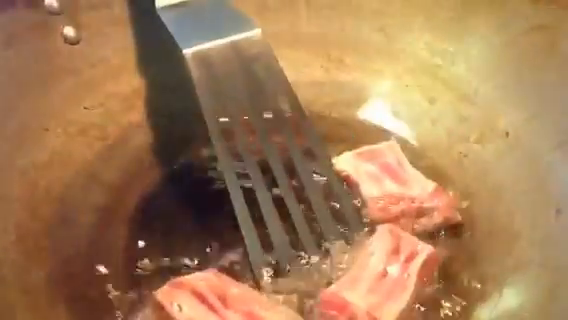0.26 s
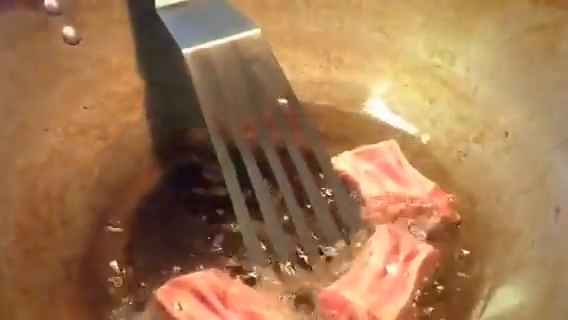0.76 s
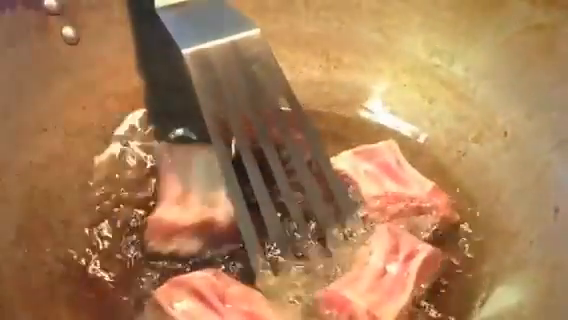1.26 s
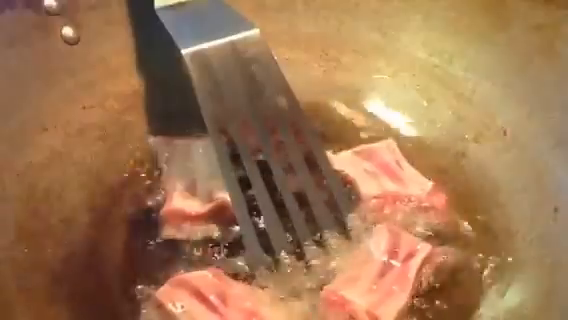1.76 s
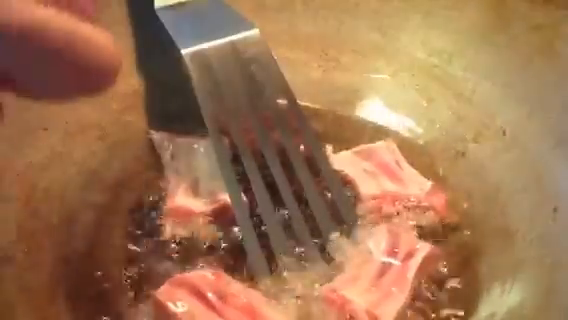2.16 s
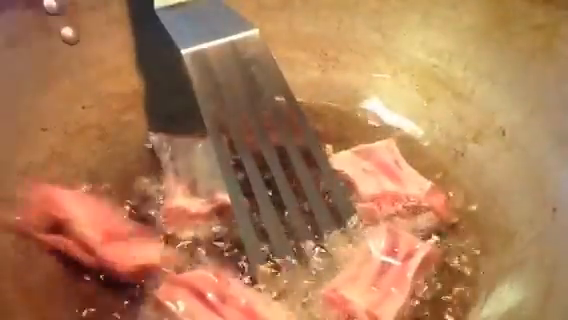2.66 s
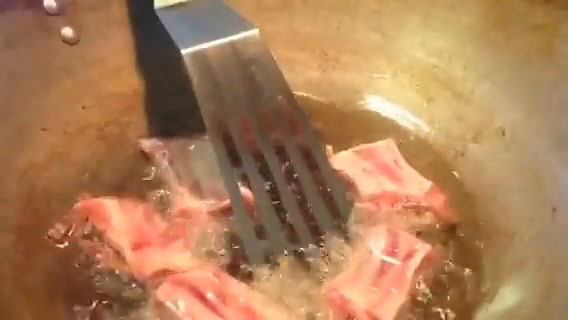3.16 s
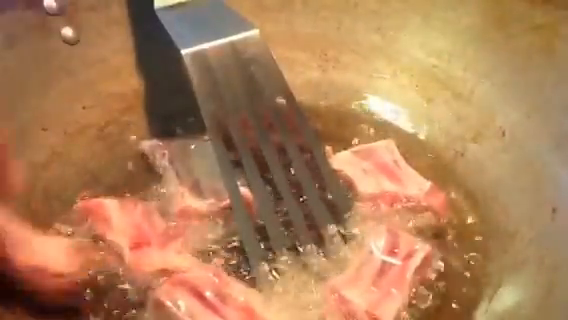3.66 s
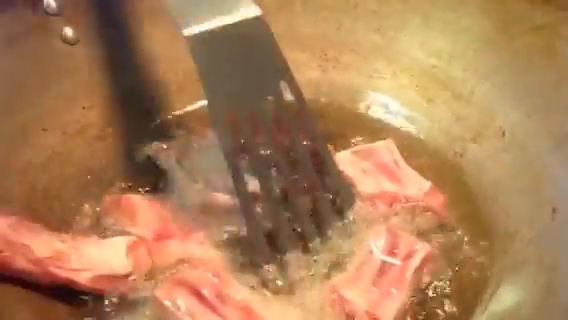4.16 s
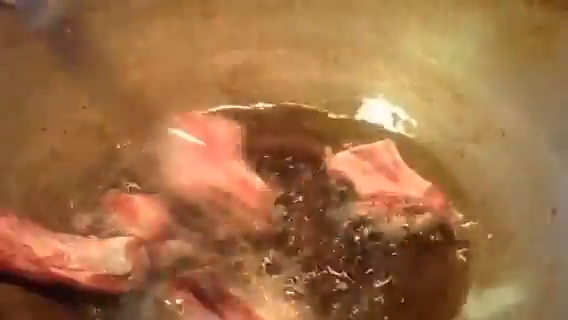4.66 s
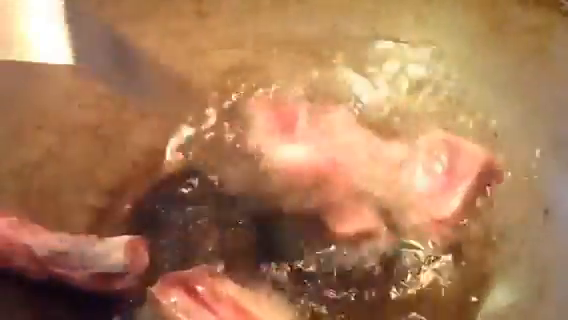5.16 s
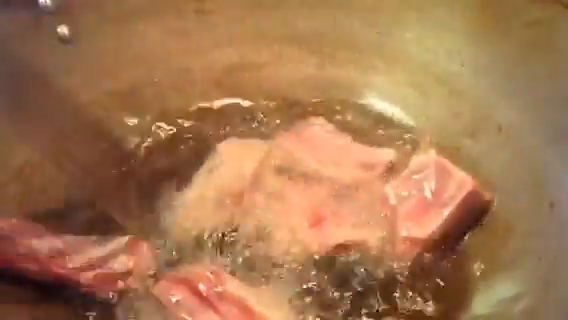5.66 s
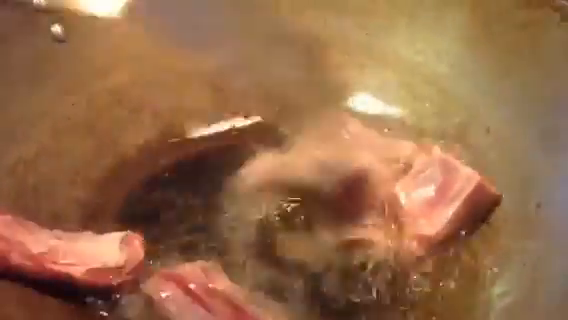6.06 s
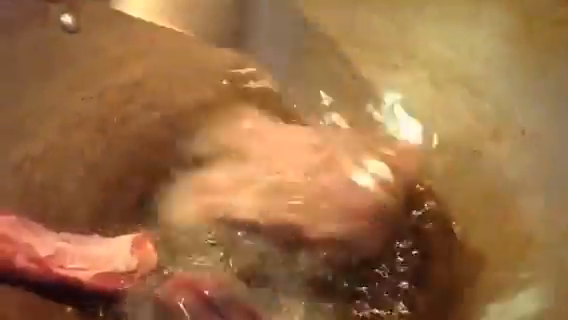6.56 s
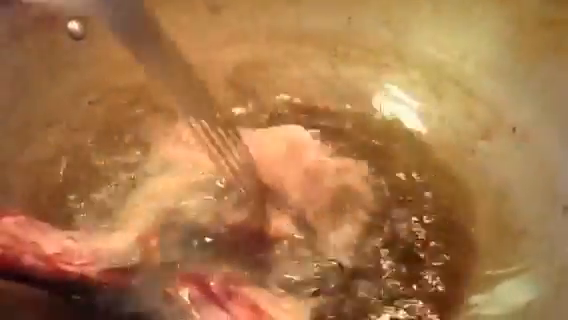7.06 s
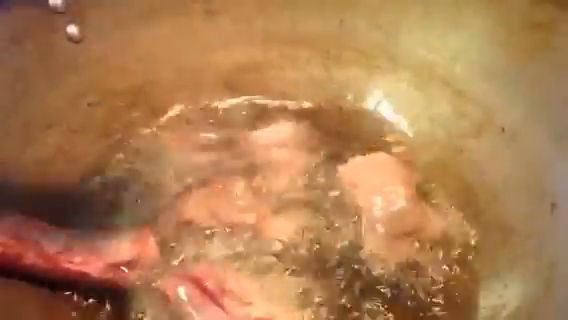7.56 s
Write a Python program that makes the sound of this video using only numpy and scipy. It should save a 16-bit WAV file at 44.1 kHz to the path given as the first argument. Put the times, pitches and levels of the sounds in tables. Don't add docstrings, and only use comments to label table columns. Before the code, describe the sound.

Close, bright frying of meat pieces in a metal wok: hissing bubbles, snapping drops and gurgles swelling steadily over a faint low fan rush.

```python
import sys
import numpy as np
from scipy import signal
from scipy.fft import rfft, irfft, next_fast_len
from scipy.io import wavfile
from scipy.ndimage import uniform_filter1d

SR = 44100
rng = np.random.default_rng(int(sys.argv[2]) if len(sys.argv) > 2 else 0)


def transcribe(signal):
    frames = np.atleast_2d(signal).T
    limited = np.clip(frames, -1, 1)
    pcm = np.round(limited * 32767).astype(np.int16)
    wavfile.write(sys.argv[1], SR, pcm)


def to_linear_factor(level_db):
    exponent = np.asarray(level_db, float) / 20
    return 10 ** exponent


N = 344421

BUBBLE_BORDERS = [1200, 1600, 3300, 3900, 4800, 5400, 6800, 8000]
# pitch_hz, level_db (per Hz)
SIZZLE_COLOUR = [(180, -45), (310, -15), (345, -13), (516, -7.5), (628, -1.5), (872, -4), (1100, -6),
                 (1480, -9), (1700, -6.5), (2100, -5), (3760, -6), (4430, -2), (8820, -12.5),
                 (14200, -14.5), (15700, -14.5)]
# time_s, boil_db
BOIL = [(0, -4.5), (.5, -4.5), (1.05, -4), (1.25, -1.5), (1.75, -2.5), (2.5, -3), (3.0, -0.5), (3.3, -2.5),
        (4.0, 1.5), (4.3, -1), (4.42, 2), (4.65, -1), (5.1, 4), (5.45, 3), (6.25, 4), (6.4, 4.5), (7.2, 6),
        (7.81, 7)]
BOIL_SHARE = [
    0.27,
    1,
    0.99,
    0.38,
    0.29,
]
# start_s, length_s, change_db
FLARES = [(0, 0.1, 4), (0.35, 0.22, 2), (0.8, 0.3, 1.5), (1.153, 0.24, 5.5), (1.43, 0.19, 1.5),
          (1.6, 0.13, 6.5), (1.953, 0.13, 2.5), (2.656, 0.11, -3), (3.344, 0.28, 0.5), (3.752, 0.16, 7.5),
          (4.08, 0.31, 2), (4.342, 0.25, 6), (4.595, 0.5, 4.5), (5.073, 0.14, 7.5), (5.195, 0.68, 2),
          (5.741, 0.39, 1.5), (6.14, 0.3, -3), (6.37, 0.24, 4.5), (6.6, 0.13, 5.5), (6.86, 0.1, 2),
          (7.12, 0.21, 2.5), (7.422, 0.58, -0.5)]
FLARE_SHARE = [.1, .2, .35, .6, 1]
# start_s, peak_db, pitch_hz, spray_db (beside the peak)
SPITS = [(0.0633, -8, 5370, -9), (0.3795, -11, 5640, -5.5), (0.484, -15.5, 5850, -3.5),
         (0.8697, -14, 5660, -5), (1.139, -11.5, 5000, -5), (1.646, -8, 4970, -14),
         (1.7045, -10, 5100, -8.5), (1.908, -17, 4570, -3.5), (1.9696, -16, 4050, -4.5),
         (2.0822, -9, 4360, -7), (2.2338, -14.5, 4930, -0.5), (2.5421, -7.5, 5000, -2.5),
         (2.5766, -13, 4900, -5), (3.2474, -13, 5330, -9), (3.298, -11.5, 4750, -8),
         (3.5698, -15.5, 4870, -6), (3.6226, -14, 4400, -6), (3.6536, -13, 4320, -6),
         (3.7578, -12, 4430, -5), (3.8292, -18, 5260, -10.5), (3.8716, -11.5, 4730, -1.5),
         (4.2776, -19, 4130, -11), (5.527, -5, 4080, -9), (5.8963, -9.5, 4400, -7.5),
         (6.3747, -4.5, 5180, -2.5), (7.222, -12, 4180, -4), (7.2998, -11.5, 5000, -6)]
# start_s, peak_db, pitch_hz, spray_db
SMALL_SPITS = [(4.3162, -15, 4290, -7), (4.3825, -11, 4300, -8), (4.411, -15, 5360, -8),
               (4.7268, -15, 4400, -8), (4.9356, -13, 4200, -7), (5.2026, -16, 4240, -4.5),
               (5.3182, -12, 4630, -7), (5.4207, -12, 4430, -6), (5.6122, -20.5, 4830, -11),
               (5.7583, -13.5, 4070, -6), (5.93, -17, 4160, -11), (6.0418, -14, 4700, -4),
               (6.119, -12.5, 5720, -6), (6.5162, -15, 5690, -9), (6.5885, -18, 4720, -10),
               (6.6853, -21, 4130, -11.5), (7.1358, -20, 4660, -9.5), (7.4341, -17, 4300, -10)]
# start_s, peak_db, pitch_hz, spray_db
FAINT_SPITS = [
    (0.2054, -23, 5770, -5),
    (0.3691, -16, 5790, -7),
    (0.9448, -17, 4960, -5),
    (1.0194, -25, 4980, -5),
    (3.5448, -17, 4470, -5),
    (3.9394, -16, 4840, -5),
    (3.9744, -16, 4900, -5),
    (4.1804, -18, 4460, -8),
]
# start_s, peak_db, pitch_hz, spray_db
TICKS = [(0.382, -10, 8370, -8), (0.7841, -26.5, 8400, -9), (0.801, -8, 9550, -13), (1.3254, -11, 9100, -7),
         (1.4451, -8, 9200, -19), (1.4904, -15, 9900, -4), (1.514, -4.5, 12100, -10),
         (1.6227, -20, 8200, -7), (2.1045, -17.5, 9480, -4), (2.6883, -17, 8350, -7),
         (2.7247, -17, 8120, -10), (2.7426, -9.5, 9830, -7), (3.049, -13, 7950, -5.5),
         (3.6521, -17, 8250, -2), (4.2782, -12, 8950, -9), (5.325, -2, 10900, -18),
         (5.5238, -0.5, 8950, -10.5), (5.5877, -16, 14300, -5), (5.691, -11.5, 8230, -6.5),
         (6.3743, -5.5, 8100, -7), (6.4585, -10, 10200, -15), (6.517, -12, 8260, -7),
         (6.8738, -12, 9900, -10), (7.1417, -15, 8440, -10), (7.449, -17, 8190, -6)]
# start_s, peak_db, pitch_hz, spray_db
SMALL_TICKS = [(1.1448, -15, 7910, -9), (1.1681, -21, 7450, -12), (1.2278, -17, 7130, -12),
               (1.238, -9.5, 10200, -10.5), (1.3717, -16, 7330, -12), (1.4045, -8, 7950, -12),
               (1.518, -7, 12700, -12), (1.7046, -9, 14800, -12), (2.0342, -17, 8350, -12),
               (2.2038, -23, 8250, -12), (2.3789, -25, 10600, -12), (2.4283, -18, 7580, -12),
               (2.5405, -15, 10200, -10), (2.9356, -22, 8970, -12), (3.348, -18, 7200, -12),
               (3.5692, -13, 8250, -12), (3.7767, -8, 7470, -12), (3.7965, -5, 7300, -10),
               (3.87, -21, 9510, -12), (4.129, -13, 7470, -12), (4.1878, -15, 7330, -12),
               (4.358, -16, 7000, -12), (4.7251, -18, 8250, -12), (4.8568, -21, 8240, -12),
               (4.9007, -5, 13500, -10), (5.1147, -13, 8520, -12), (5.7153, -14, 7110, -12),
               (5.8795, -17, 7720, -12), (6.1059, -18, 7320, -12), (6.435, -14, 7420, -12),
               (6.6317, -18, 8040, -12), (7.2199, -17, 7340, -12), (7.7148, -28, 7000, -11)]
# start_s, peak_db, pitch_hz, spray_db
SNAPS = [
    (1.4452, -1, 6840, -15),
    (1.6245, -8, 5150, -13),
    (4.551, -1.5, 5900, -16),
]
# start_s, peak_db, pitch_hz, spray_db
GURGLES = [(0.3805, -12, 2830, -22), (1.6816, -12.5, 3020, -9), (2.1037, -13, 2560, -18.5),
           (2.712, -22, 3060, 2), (3.0495, -9, 3350, -12), (3.6515, -12, 2530, -19),
           (3.8292, -11.5, 1930, -6), (4.09, -11, 2670, -18), (4.2798, -17, 1500, -13),
           (4.6109, -18, 1948, 2.5), (4.6972, -20, 1770, 1), (4.804, -15, 3070, -2.5),
           (4.9317, -13, 2260, -9), (5.026, -17, 2190, -0.5), (5.0754, -14, 2020, -6),
           (5.214, -17, 3200, 0), (5.3623, -14, 2045, -15.5), (5.6633, -15.5, 2540, -2),
           (5.795, -10.5, 2966, -3), (5.904, -10, 1890, -18), (5.9618, -11.5, 2740, -7),
           (6.0187, -15, 2027, -5), (6.3134, -11.5, 2460, -5), (6.964, -8.5, 2400, -12),
           (7.011, -9.5, 1810, -4), (7.2223, -12, 3160, -4), (7.434, -19, 2550, -3), (7.46, -13, 2420, -10),
           (6.385, -16.5, 1757, 0), (7.7173, -10, 2050, -8)]
# start_s, peak_db, pitch_hz, spray_db
SMALL_GURGLES = [(1.9155, -15.5, 2380, -7), (4.4748, -15, 3130, -5), (4.8255, -19, 2300, -4.5),
                 (4.8495, -15, 2400, -8.5), (5.4347, -19, 3030, 0), (5.487, -21, 2530, -6),
                 (5.6392, -22, 2460, -4), (5.708, -16, 3050, -8), (5.7589, -18, 2100, -7),
                 (5.8303, -16, 1740, -10), (5.936, -18, 2500, -6), (6.158, -24, 2620, -10),
                 (6.2048, -16.5, 2420, -12), (6.4753, -14, 2510, -10), (6.5641, -14, 2430, -4),
                 (6.6838, -20, 2990, -6), (6.7012, -15, 1880, -5), (6.7491, -13.5, 2450, -6),
                 (6.8618, -19, 2060, -3.5), (7.1617, -18, 2280, -3), (7.2494, -14, 2120, -6),
                 (7.3894, -17, 1900, -6), (7.5409, -17, 2640, -6), (7.5794, -16, 2700, -6),
                 (7.6117, -16, 2630, -9), (7.6381, -11, 2500, -9), (7.6544, -15, 2480, -13),
                 (7.7444, -19, 1500, -7.5)]
# start_s, peak_db, pitch_hz, spray_db
THUMPS = [(1.668, -18.5, 787, -5), (1.823, -20.5, 627, -21), (2.103, -9.5, 690, -8), (2.693, -22, 753, -5),
          (3.119, -17, 625, 2), (3.4415, -10.5, 740, -3.5), (3.617, -26, 633, 2), (3.996, -19, 640, -8),
          (4.278, -14.5, 634, -2), (4.383, -26, 643, -3), (4.55, -15.5, 630, -16.5), (4.724, -20, 704, 2.5),
          (5.015, -28, 697, 8), (5.325, -22.5, 670, 0.5), (5.829, -21, 725, -16), (6.374, -27, 593, 6),
          (6.511, -17, 1040, 2), (6.554, -15.5, 1060, -3), (7.131, -21, 1300, -18), (7.396, -14, 637, -15)]
# start_s, peak_db, pitch_hz, spray_db
SMALL_THUMPS = [(0.396, -28, 649, 3), (1.198, -25, 760, -3), (2.163, -24, 630, 0), (2.646, -25, 986, -7),
                (2.803, -25, 690, -6), (2.847, -23, 630, -11), (2.916, -22, 736, -6),
                (2.936, -16.5, 740, -8), (3.011, -26, 649, -6), (3.472, -19, 654, 0),
                (3.725, -27, 614, -3.5), (3.869, -21.5, 643, -2), (4.46, -31, 630, -9),
                (4.692, -25, 705, -6), (4.858, -25, 1050, -2), (4.92, -26.5, 536, -8),
                (5.123, -18, 1100, -6), (5.207, -26, 622, -6), (5.257, -24, 1100, -6),
                (5.588, -20.5, 640, -8), (5.757, -23, 632, -6), (5.927, -24, 978, -6),
                (6.779, -15, 945, -4), (7.467, -23, 598, -6)]
# start_s, peak_db, pitch_hz, spray_db
KNOCKS = [
    (2.1035, -7.5, 2600, -3),
    (3.652, -14, 2800, -0.5),
    (4.2785, -13, 2400, -0.5),
    (6.375, -13, 2000, 5),
]
# start_s, peak_db
CRACKS = [(0.0646, -12), (0.3837, -8), (0.609, -11), (0.8021, -24), (1.1385, -13), (1.1478, -0.5),
          (1.4463, -8), (1.5171, -6), (1.5204, -8), (1.6254, -5), (1.7067, -7), (2.1051, -8),
          (2.6897, -16.5), (2.9378, -5), (3.4434, -25.5), (3.6532, -4), (3.7787, -1), (4.1305, -4),
          (4.2796, -4), (4.5522, -14), (4.9024, -6), (5.3262, -16), (5.4226, -7), (5.5252, 0), (5.5888, -1),
          (5.7171, -9), (6.378, -3), (6.5179, -7), (6.5921, -4), (7.4611, -12.5)]
# start_s, peak_db
SMALL_CRACKS = [
    (0.3691, -14),
    (0.4843, -14),
    (0.5496, -16),
    (0.6694, -20),
    (0.9444, -13),
    (0.9714, -16),
    (0.9894, -14),
    (3.7993, -10),
    (3.8294, -13),
]
# start_s, peak_db, width_ms
BLOWS = [
    (2.1051, -9, 0.19),
    (3.4428, -11, 0.23),
    (3.6532, -5, 0.086),
    (4.2796, -6, .15),
    (5.5252, -12, 0.067),
]
# start_s, length_s, start_hz, end_hz, level_db
JETS = [(0.3, 0.077, 4946, 5930, -32), (1.182, 0.11, 5754, 7960, -31), (1.15, .25, 2600, 3200, -37),
        (2.703, 0.064, 3460, 6863, -19), (3.025, 0.042, 3500, 5000, -26.5), (3.4, 0.074, 5100, 5995, -29),
        (4.34, 0.098, 4520, 5560, -23), (4.2, 0.076, 8880, 11200, -39), (3.9, 0.047, 4250, 4510, -25),
        (2.6, 0.03, 8400, 8640, -36), (2.1, 0.033, 8600, 7970, -30), (6.331, 0.035, 1465, 1644, -22),
        (6.82, 0.0666, 4600, 5020, -22)]
# pitch_hz, width_hz, level_db
WOK_RINGS = [(522, 36, -3), (640, 12, 4), (735, 46, -3), (909, 35, -6.5), (1067, 32, -2.5), (1140, 30, -7),
             (1546, 51, -4), (1730, 7.3, 1), (1875, 27, -1.5), (2110, 9.8, -1.5), (2480, 38, -4.5),
             (2760, 16, -6), (4460, 91, -12)]
# pitch_hz, width_hz, removed_db
HOLLOWS = [(856, 117, -9.5), (1211, 177, -9.5), (1577, 47, -11)]
# start_s, length_s, start_hz, end_hz, level_db
HUMS = [
    (1.8, 1.35, 745, 690, -48),
    (2.9, 1.527, 730, 820, -47),
    (1.9, 4.7, 640, 690, -45),
    (6.45, 0.51, 1000, 1120, -35.5),
    (7.45, 0.26, 440, 630, -44.5),
]
# pitch_hz, level_db (per Hz)
HOOD_COLOUR = [(12, -57), (20, -27), (48, -38), (64, -42), (109, -4.5), (139, 1), (233, -1), (296, -12),
               (310, -9), (400, -1.5), (680, -120)]


def evened(x):
    return x / np.sqrt(np.mean(x ** 2) + 1e-20)


def look_up(points, hz):
    f, value = np.transpose(points)
    return np.interp(np.log(hz + 1), np.log(f + 1), value)


def every_sample(steps):
    return np.interp(np.arange(N) / 64, np.arange(len(steps)), steps)


def resonate(x, hz, width):
    r = np.exp(-np.pi * width / SR)
    lean = r * np.cos(2 * np.pi * hz / SR)
    return signal.lfilter([2 * (1 - r), -2 * (1 - r) * lean], [1, -2 * lean, r ** 2], x)


def vigour(t):
    rise_s, fall_s = 0.02, 0.037
    flare_db = 0
    for s, length, db in FLARES:
        shape = np.minimum((t - s) / rise_s, (s + length - t) / fall_s)
        flare_db = flare_db + db * np.clip(shape, 0, 1)
    boil_db = np.interp(t, *np.transpose(BOIL))
    level_db = np.outer(BOIL_SHARE, boil_db) + np.outer(FLARE_SHARE, flare_db)
    return level_db - level_db.mean(axis=1, keepdims=True)


def flicker(per_s):
    kicks = uniform_filter1d(rng.exponential(1, N // 64 + 2) ** 1.436, size=2)
    fade = np.exp(-2 * np.pi * per_s * 64 / SR)
    slow = evened(signal.lfilter([1], [1, -fade], kicks - kicks.mean()))
    return 3.13 * np.tanh(slow / 3.0)


def ring(hz, cycles, glide, size):
    turns = np.arange(size) * hz / SR
    fade = (1 - np.exp(-4 * turns)) * np.exp(-turns / cycles)
    return fade * np.sin(2 * np.pi * turns * (1 + glide * turns))


def sizzle():
    bubbles_per_s, spread_db, hiss = 320, 2.5, 0.78
    shared_db, patchy_db = 0.85, 1.42
    crowd_s, crowd_db, crowd_hz = 2, 2, 800
    t = np.arange(N // 64 + 2) * 64 / SR
    vigour_db = vigour(t)
    calm = to_linear_factor(-.3 * uniform_filter1d(vigour_db[1], size=400))
    shared = flicker(15)
    patches = [flicker(16) for _ in range(11)]
    out = np.zeros(N)
    for k, hz in enumerate(np.geomspace(340, 15200, 40)):
        place = np.interp(np.log(hz), np.log(BUBBLE_BORDERS), (np.arange(8) + 1) // 2)
        low = min(int(place), 3)
        level_db = vigour_db[low] + (place - low) * (vigour_db[low + 1] - vigour_db[low])
        level_db = level_db + crowd_db * (hz < crowd_hz) * np.clip((t - crowd_s) / .15, -1, 0)

        angle = np.pi / 2 * (k % 4) / 4
        patch = np.cos(angle) * patches[k // 4] + np.sin(angle) * patches[k // 4 + 1]
        clump = to_linear_factor(level_db + calm * (shared_db * shared + patchy_db * patch))

        chance = rng.random((3000, 3))
        chance = chance[chance[:, 2] < bubbles_per_s * (hz / 4000) ** .3 * N / SR / 3000]
        size = to_linear_factor(-spread_db * np.log(chance[:, 1] + 0.0091))
        sign = (-1) ** np.arange(len(chance))
        train = np.bincount((chance[:, 0] * N).astype(int), size * sign, N)
        drive = evened(train) + hiss * rng.standard_normal(N)

        note = ring(hz, 3.04, 0.0059, int(18 * SR / hz) + 16)
        gain = to_linear_factor(look_up(SIZZLE_COLOUR, hz)) * np.sqrt(hz) / np.linalg.norm(note)
        out += signal.oaconvolve(drive * every_sample(clump), gain * note)[:N]
    return to_linear_factor(-25) * evened(out)


def bursts(tables, cycles, breadth, t60, mist_db):
    out, t = np.zeros(N + 4096), np.arange(4096) / SR
    for s, db, hz, spray_db in np.vstack(tables):
        note = ring(hz, cycles, 0.0014, 4096)
        air = rng.standard_normal(4096)
        mist = to_linear_factor(mist_db - 60 * t / (.5 * t60)) * np.diff(air, prepend=0)
        spray = resonate(air, hz * 1.01, breadth * hz)
        spray = evened(resonate(spray, hz * 1.01, breadth * hz))
        spurts = evened(uniform_filter1d(air[::-1], size=100))
        spray = spray * to_linear_factor(2.7 * spurts - 4.5)
        spray = spray * to_linear_factor(spray_db - 60 * t / t60) * (1 - np.exp(-t / 0.0018))
        burst = to_linear_factor(-2.5) * note / abs(note).max() + mist + spray
        out[round((s + .0008) * SR):][:4096] += to_linear_factor(db) * burst
    return out[:N]


def spits():
    return bursts([SPITS, SMALL_SPITS, FAINT_SPITS], 5.2, 0.308, 0.086, -50)


def ticks():
    loud = bursts([TICKS, SNAPS], 2.3, 0.68, 0.084, -25)
    return loud + bursts([SMALL_TICKS], 2.1, 0.32, .03, -34)


def stray_gurgles(count=35, low_hz=1700, high_hz=3300):
    draw = rng.random((count, 4))
    when = draw[:, 0] * (N - 200) / SR
    level_db = -23 + 1.7 * vigour(when)[1] - 0.5 * (2 * draw[:, 1] - 1)
    pitch_hz = low_hz * (high_hz / low_hz) ** draw[:, 2]
    return np.c_[when, level_db, pitch_hz, -3 - 5 * draw[:, 3]]


def gurgles():
    clear = bursts([GURGLES, SMALL_GURGLES], 4.5, 0.16, 0.11, -26)
    return clear + bursts([stray_gurgles()], 6.9, .12, 0.089, -30)


def thumps():
    deep = bursts([THUMPS], 1.1, 0.75, 0.052, -28)
    small = bursts([SMALL_THUMPS], 3.0, 0.17, 0.077, -35)
    return deep + small + bursts([KNOCKS], 0.8, 1.4, 0.053, -18)


def cracks(count=900, stray_db=-24, spread_db=2.0):
    draw = rng.random((count, 3))
    when = draw[:, 0] * (N - 200) / SR + 0.0019
    level_db = vigour(when)[2] + stray_db - spread_db * np.log(draw[:, 1] + .03)
    strays = np.c_[when, level_db, .022 + .03 * draw[:, 2]]
    small = np.array(SMALL_CRACKS) + [.0009, 5.0]
    loud = np.vstack([CRACKS, small])
    loud = np.c_[loud, np.full(len(loud), 0.042)]
    out, ms = np.zeros(N + 64), np.arange(-32, 32) * 1000 / SR
    for s, db, width in np.vstack([loud, BLOWS, strays]):
        u = (ms / max(0.64 * width, .012)) ** 2
        dip = 1.4 * np.exp(-u / 2) - 0.628 * np.exp(-u / 12)
        out[round(s * SR) - 32:][:64] -= to_linear_factor(db) * dip
    return out[:N]


def gliding_noise(rows, breadth):
    out = np.zeros(N)
    for s, length, start_hz, end_hz, db in rows:
        u = np.linspace(0, 1, round(length * SR))
        pitch_hz = start_hz + (end_hz - start_hz) * u
        turn = np.cos(2 * np.pi * np.cumsum(pitch_hz) / SR)
        air = evened(resonate(rng.standard_normal(len(u)), 0, breadth * start_hz) * turn)
        out[round(s * SR):][:len(u)] += to_linear_factor(db) * air * np.sin(np.pi * u ** 1.8)
    return out


def steam_jets():
    return gliding_noise(JETS, 0.29)


def spatula_hums():
    return gliding_noise(HUMS, 0.014)


def wok(oil, dry):
    ringing = oil + sum(to_linear_factor(db) * resonate(oil + dry, hz, width) for hz, width, db in WOK_RINGS)
    swallowed = sum(to_linear_factor(db) * resonate(ringing, hz, width) for hz, width, db in HOLLOWS)
    return ringing - swallowed


def reflections(x, t60, wet_db):
    t, out = np.arange(SR // 10) / SR, x.copy()
    spot = np.repeat(rng.integers(0, 4, N // 128 + 1), 128)[:N]
    for k in range(4):
        hits = rng.random(len(t)) < 3000 / SR
        taps = rng.choice([-1., 1.], len(t)) * hits * to_linear_factor(-60 * t / t60)
        share = uniform_filter1d(1. * (spot == k), 32)
        out += to_linear_factor(wet_db) * signal.oaconvolve(x * share, taps / np.linalg.norm(taps))[:N]
    return out


def hood():
    size = next_fast_len(N)
    colour = to_linear_factor(look_up(HOOD_COLOUR, np.fft.rfftfreq(size, 1 / SR)))
    rush = irfft(rfft(rng.standard_normal(size)) * colour, size)
    return to_linear_factor(-50) * evened(rush[:N])


def scene():
    drops = spits() + ticks() + gurgles() + thumps()
    bass_cut = signal.butter(4, 260, "high", fs=SR, output="sos")
    oil = signal.sosfilt(bass_cut, sizzle() + drops + steam_jets())
    dry = cracks()
    near = wok(oil, dry) + spatula_hums() + 0.57 * dry
    mix = to_linear_factor(-3.0) * reflections(near, 0.094, -6.5) + .5 * dry + hood()
    return np.tile(mix, (2, 1))


def thin_treble(x, from_hz=12500, under_db=-2.0):
    hz, _, z = signal.stft(x, SR, nperseg=2048)
    power = uniform_filter1d(abs(z) ** 2, size=10, axis=0)
    around = uniform_filter1d(power, size=80, axis=0)
    below_top = np.clip((15500 - hz) / (15500 - from_hz), 0, 3)[:, None]
    margin_db = under_db - 0.93 * below_top
    faint = (power < around * to_linear_factor(2 * margin_db)) & (hz > from_hz / 2)[:, None]
    return signal.istft(z * np.where(faint, .06, 1), SR, nperseg=2048)[1][:N]


def band_limit(x):
    return signal.sosfilt(signal.butter(12, 15820, fs=SR, output="sos"), x)


def record(dry):
    bass_cut = signal.butter(3, 100, "high", fs=SR, output="sos")
    mono = signal.sosfilt(bass_cut, dry[0])
    upper_limit = signal.firwin(301, 15070, window=("kaiser", 8), fs=SR)
    mono = signal.oaconvolve(thin_treble(mono), upper_limit, "same")
    return band_limit(np.tile(mono, (2, 1)))


dry = scene()
out = record(dry)
transcribe(out)
```